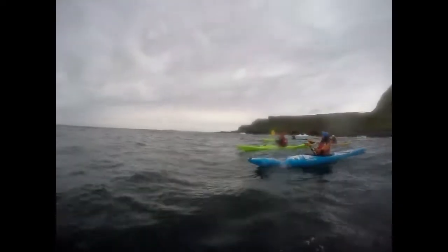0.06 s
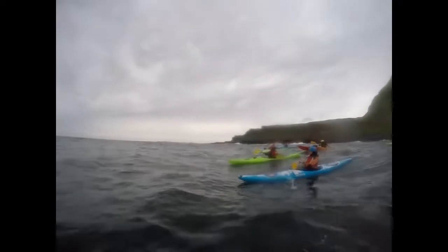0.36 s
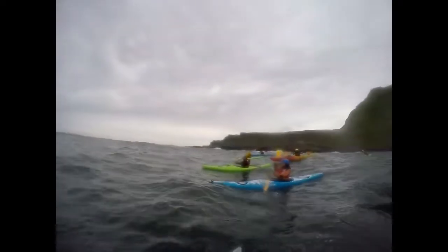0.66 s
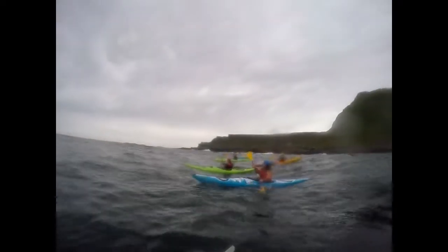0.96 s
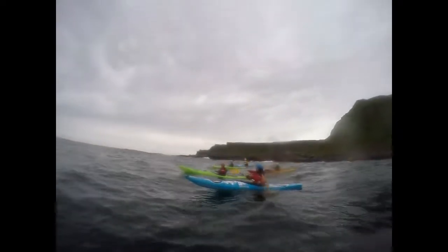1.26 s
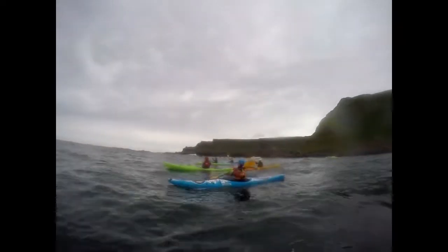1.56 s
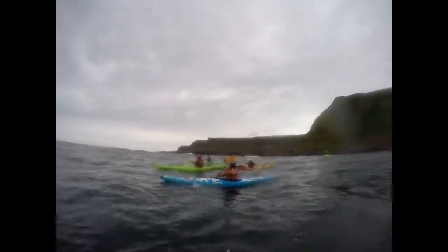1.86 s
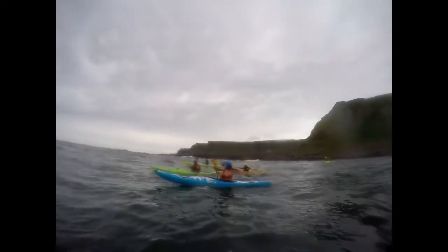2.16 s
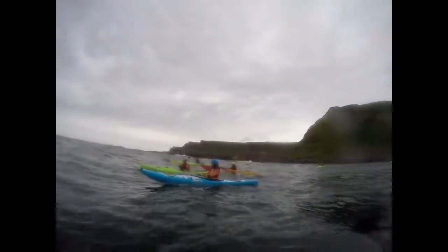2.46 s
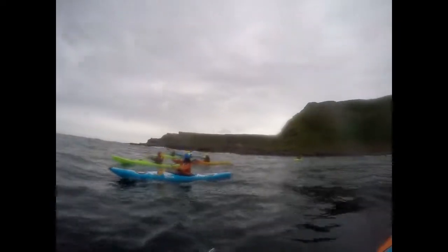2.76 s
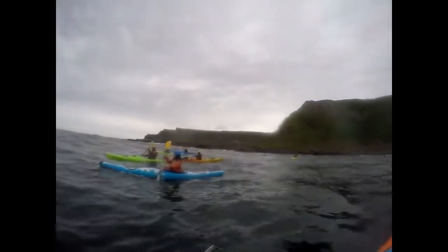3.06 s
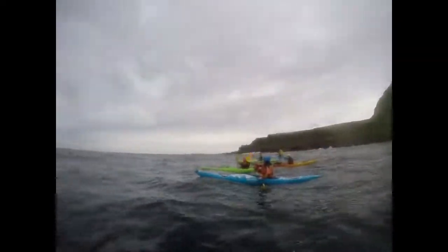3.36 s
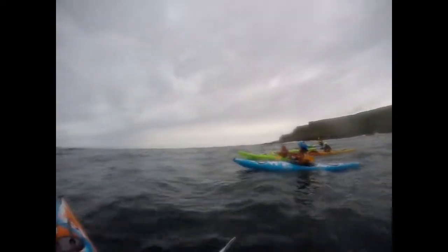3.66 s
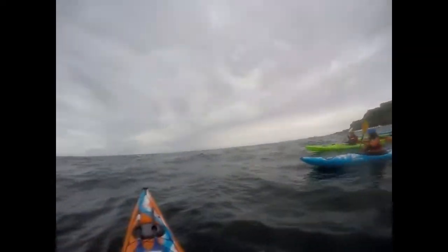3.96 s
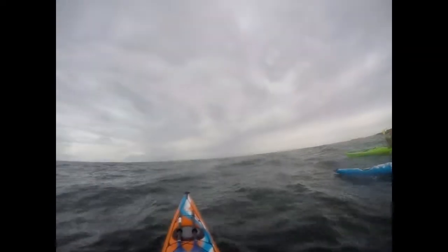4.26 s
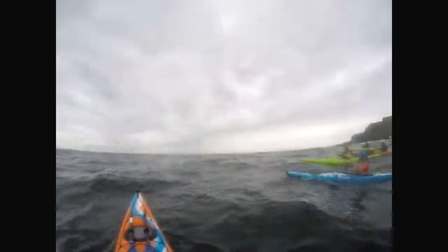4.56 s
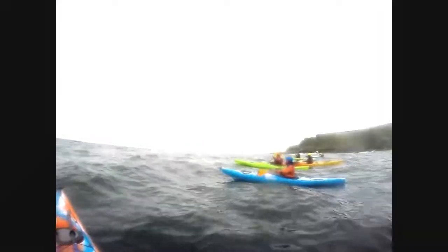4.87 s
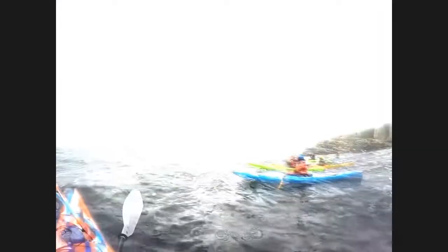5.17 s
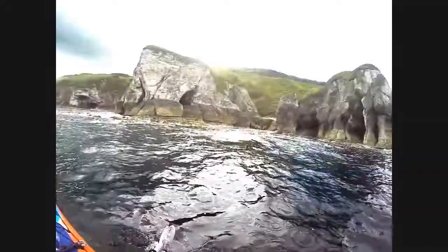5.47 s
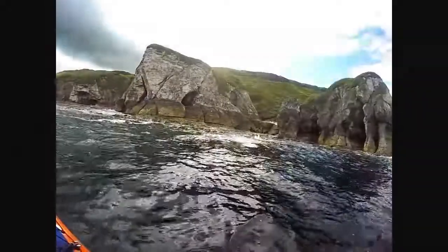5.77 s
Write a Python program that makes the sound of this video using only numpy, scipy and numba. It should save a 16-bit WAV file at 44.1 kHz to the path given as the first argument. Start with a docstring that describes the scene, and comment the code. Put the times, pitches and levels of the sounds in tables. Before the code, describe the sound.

Choppy sea water sloshes and slaps against a kayak hull, with bubbly plinks, pattering spray and a soft wash of waves behind. Wind rumbles and buffets the microphone, which sits close to the water in a waterproof case. Near the end the open sea fades away, and slightly brighter splashing cuts in suddenly with more wind rumble.

```python
"""Wavelets slosh and slap a kayak's hull in choppy sea, folding in air that rings as bubbles.
Spray and drips patter down over the wash of the sea. The water is heard through a waterproof
camera case on the paddler; wind rumbles and buffets on the case.
Open water fades out; a second scene cuts in, close under cliffs, with brighter splashing."""
import sys
import numpy as np
from scipy import signal
from scipy.fft import rfft, irfft, next_fast_len
from scipy.io import wavfile
from scipy.ndimage import uniform_filter1d
from numba import njit

SR = 44100
rng = np.random.default_rng(int(sys.argv[2]) if len(sys.argv) > 2 else 0)


def transcribe(signal):
    """Save signal, clipped to [-1, 1], as a 16-bit WAV file at the path in sys.argv[1]."""
    frames = np.atleast_2d(signal).T
    limited = np.clip(frames, -1, 1)
    pcm = np.round(limited * 32767).astype(np.int16)
    wavfile.write(sys.argv[1], SR, pcm)


N = 265482

# Slosh and spray spectra: (frequency [Hz], relative density [dB])
SLOSH_OPEN_SPECTRUM = [(600, -3), (1200, -27), (1500, -2.5), (2100, -0.5), (2600, 1), (3200, -9),
                       (5000, -43)]
SLOSH_CLIFF_SPECTRUM = [(600, -32), (1200, -1), (1900, 6.5), (2350, 4.5), (2650, -5), (3200, -8),
                        (5000, -37)]
SPRAY_SPECTRUM = [(1500, -18), (3100, -2), (4500, -5), (5800, -3.5), (6600, -9.5), (8500, -9),
                  (12000, -13.5), (15500, -23)]
# Wavelets at the hull: (crest time [s], length [s], relative slosh [dB], relative spray [dB])
HULL_WAVELETS = [(.02, 0.096, -54.5, -60), (.23, 0.12, -62, -65.5), (.385, 0.093, -54.5, -55),
                 (.45, 0.084, -55.5, -72), (.59, .1, -59, -65), (.79, .09, -56.5, -64),
                 (.89, 0.14, -60, -61.5), (1.21, 0.12, -58.5, -62), (1.59, 0.099, -64, -56),
                 (1.73, 0.13, -63, -61.5), (1.91, 0.14, -71, -61), (2.17, 0.046, -64, -72),
                 (2.5, 0.13, -58.5, -58), (2.74, 0.21, -77, -58.5), (2.9, 0.12, -62, -58),
                 (3.1, .06, -70, -60), (3.3, 0.25, -64, -84), (3.66, .12, -69, -73), (4.05, 0.14, -59, -72),
                 (4.29, 0.19, -57, -66), (5.35, 0.18, -54.5, -64.5), (5.52, 0.15, -61, -60.5),
                 (5.66, 0.085, -57, -69)]


def hull_water(spectrum, rest_db, slosh_trim_db, spray_trim_db):
    """Water laps at rest_db (slosh, spray); each wavelet adds bubbles and spray in uneven spurts."""
    slosh_level, spray_level = swells(HULL_WAVELETS, rest_db, rise=0.51, fall=0.66)
    spurts = wander(rate_hz=55)
    slosh = bubble_cloud(per_s=2800, low_hz=908, high_hz=3650, cycles=30.7, scatter_db=2.5)
    spray = bubble_cloud(per_s=4600, low_hz=2647, high_hz=12400, cycles=18.7, scatter_db=2.5)
    slosh = colour(slosh, spectrum) * slosh_level * undb(slosh_trim_db + 0.93 * spurts)
    spray = colour(spray, SPRAY_SPECTRUM) * spray_level * undb(spray_trim_db + 1.47 * spurts)
    return slosh + spray


# Waves slapping the hull: (time [s], relative level [dB], pitch [Hz], spread [oct], time scale [s])
HULL_SPLASHES = [ (0.022, -49, 2260, .16, .012), (0.074, -54.5, 4230, 0.84, 0.0099),
                 (.103, -48.5, 1850, 0.21, 0.013), (0.328, -41.5, 1790, 0.33, 0.0048),
                 (.354, -44, 2190, 0.67, 0.0072), (.579, -52.5, 5900, 0.39, .008),
                 (0.609, -54, 4150, 0.55, 0.015), (0.782, -44, 2730, 0.54, .003),
                 (.793, -44.5, 2100, .3, .012), (.794, -45.5, 4600, 0.3, .011),
                 (.847, -45.5, 4200, 0.45, .003), (0.926, -50, 2030, 0.28, .005),
                 (1.134, -50, 2150, 0.28, 0.0071), (1.414, -52, 3220, 0.14, .005),
                 (1.446, -53.5, 1740, 0.22, 0.0067), (1.557, -52.5, 3200, 0.36, 0.031),
                 (1.595, -33.5, 3050, 0.27, .0014), (1.598, -36.5, 3720, .3, .003),
                 (1.599, -52, 9000, .5, 0.0037), (1.606, -50, 3480, .59, 0.012),
                 (2.071, -46, 1260, .25, 0.0033), (2.252, -54, 2530, 0.31, .009),
                 (2.414, -54.5, 5130, 0.6, 0.0068), (2.481, -53, 1610, .5, 0.01),
                 (2.862, -51, 4600, 0.2, .007), (2.906, -52.5, 1160, 0.27, .022),
                 (3.107, -47, 4230, 0.29, 0.0077), (3.712, -56, 4600, 0.46, 0.018),
                 (4.253, -43, 2030, 0.48, .004), (4.359, -54.5, 2420, 0.36, .01),
                 (4.74, -48.5, 1880, 0.43, .0065), (5.319, -52, 2470, 0.15, .018),
                 (5.368, -55, 1950, .56, .023), (5.4, -53, 4050, .65, .016),
                 (5.443, -54, 7040, 0.55, 0.015), (5.4557, -37.5, 7160, 0.595, 0.0023),
                 (5.552, -53, 4760, 0.28, 0.0058), (5.67, -43, 4260, .41, 0.0046)]


def splashes(trim_db, cycles, tail_db, tail_stretch, slap_db, rolloff_hz, count=120):
    """Each splash bursts into bubbles over a dull slap; weaker droplets fall back after it."""
    out = np.zeros(N)
    late = np.arange(count) % 3 == 0
    t = np.arange(SR // 4) / SR
    slap_band = signal.butter(1, [120, 1200], "band", fs=SR, output="sos")
    for time_s, db, pitch_hz, spread_oct, scale_s in HULL_SPLASHES:
        weakness, ring = rng.random((2, count))
        start_s = scale_s * rng.triangular(0, .5, 1.4, count) * np.where(late, tail_stretch, 1)
        detune = np.sqrt(6) * rng.triangular(-1, 0, 1, count)  # unit variance
        hz = np.minimum(pitch_hz * 2 ** (spread_oct * detune), SR / 3)
        gain = undb(-8 * weakness + tail_db * late) * (hz / pitch_hz) ** .3
        gain /= 1 + (hz / rolloff_hz) ** 4  # the tiniest bubbles are weakest
        burst = bubbles(start_s, hz, cycles * (.5 + ring), gain, glide=0.24, samples=len(t))
        slap_noise = rng.standard_normal(len(t)) * t / scale_s * np.exp(-2 * t / scale_s)
        slap = signal.sosfilt(slap_band, slap_noise)
        splash = unit(burst) + undb(slap_db) * unit(slap)
        add(out, time_s, splash * undb(db) * np.sqrt(scale_s / t[-1]))
    return out * undb(trim_db)


# Single bubbles: (time [s], relative peak [dB], pitch [Hz], ring [cycles])
LONE_BUBBLES = [(.362, -43.5, 1980, 110), (.448, -39, 2140, 56), (1.595, -25, 2870, 22),
                (1.598, -29, 3030, 25), (1.924, -47.5, 4870, 79), (1.967, -49, 4900, 60),
                (2.531, -44, 2210, 55), (2.573, -42, 2330, 55), (2.721, -39.5, 4400, 41),
                (5.386, -39, 1140, 31), (5.395, -34.5, 1730, 31), (5.456, -29, 3420, 33),
                (5.456, -30, 7200, 40), (5.585, -40.5, 3500, 61), (5.602, -44, 4600, 50)]


def plinks(trim_db, glide):
    """Lone bubbles ring out close to the case."""
    start_s, db, hz, cycles = np.array(LONE_BUBBLES, float).T.copy()
    return bubbles(start_s, hz, cycles, undb(db + trim_db), glide, N)


# Air pockets: (time [s], level [dB], pitch [Hz], length [s])
AIR_GULPS = [(.845, -65, 586, 0.019), (2.04, -65.5, 510, .05), (2.205, -64, 550, .055),
             (5.665, -59.5, 342, 0.027)]


def gulps():
    """Trapped air gulps hollowly, sagging in pitch."""
    return throbs(AIR_GULPS, glide=-0.057)


def drips(level_db):
    """Stray drops fall back into the sea at random and ring faintly."""
    drops = bubble_cloud(per_s=12, low_hz=1983, high_hz=6200, cycles=53, scatter_db=3.5)
    return undb(level_db) * unit(drops)


# Wind spectra: (frequency [Hz], relative density [dB])
RUMBLE_SPECTRUM = [(5, -12), (14, 4), (26, -1.5), (36, -0.5), (50, -11), (70, -27), (140, -36.5)]
BUFFET_SPECTRUM = [(35, -25), (60, 2.5), (95, 6), (112, -8), (130, -10), (200, -25), (400, -62)]
# Gusts on the case: (peak time [s], length [s], relative rumble [dB], relative buffeting [dB])
WIND_GUSTS = [(.03, 0.11, -41, -78), (.34, 0.23, -40, -66), (.6, 0.1, -40.5, -63), (.79, 0.11, -44.5, -60),
              (1.38, 0.2, -60, -60), (1.86, 0.28, -46, -75), (2.2, 0.13, -46, -74), (2.46, 0.058, -41, -74),
              (2.84, 0.39, -43.5, -75), (3.33, 0.21, -42.5, -53.5), (3.92, 0.12, -55, -53),
              (4.1, 0.24, -52, -53.5), (4.48, 0.2, -64, -54), (4.71, .08, -60, -54), (5.56, 0.21, -40, -69),
              (5.79, 0.15, -42.5, -66), (5.89, 0.064, -53, -50.5), (5.98, .1, -44, -68)]


def wind(rest_db, rumble_trim_db, buffet_trim_db):
    """A breeze rumbles and buffets on the case at rest_db (rumble, buffeting); gusts swell both."""
    rumble_level, buffet_level = swells(WIND_GUSTS, rest_db, rise=0.56, fall=0.52)
    rumble = undb(rumble_trim_db) * rumble_level * eddies(RUMBLE_SPECTRUM, steadiness=0.94)
    buffet = undb(buffet_trim_db) * buffet_level * eddies(BUFFET_SPECTRUM, steadiness=0.74)
    return rumble + buffet


def eddies(spectrum, steadiness):
    """Turbulent pressure; steadiness (0 to 1) evens its strength over a few swings."""
    pressure = colour(rng.standard_normal(N), spectrum)
    power = uniform_filter1d(pressure ** 2, SR // 10) + 1e-6
    return unit(pressure / power ** (steadiness / 2))


# Eddies hitting the case: (time [s], level [dB], pitch [Hz], length [s])
EDDY_THUMPS = [(3.350, -32.5, 64.7, .016), (4.045, -42, 83, 0.023), (4.107, -38.5, 63.7, 0.027)]


def thumps():
    """Single eddies thump the case, rising in pitch."""
    return throbs(EDDY_THUMPS, glide=0.2)


# Far sea spectra: (frequency [Hz], relative density [dB])
WASH_OPEN_SPECTRUM = [(70, -44), (130, -3.5), (250, -6.5), (570, -9.5), (660, -15.5), (800, -12),
                      (1260, -14.5), (1400, -9.5), (1700, -11), (2500, -18), (4000, -22), (6000, -24.5),
                      (8000, -27.5), (12000, -31), (15500, -34.5)]
WASH_CLIFF_SPECTRUM = [(70, -15), (150, -6.5), (330, -6), (620, -10.5), (1200, -8.5), (1550, -6),
                       (2000, -14), (2400, -11), (2900, -12.5), (4200, -18.5), (8000, -31), (12000, -31),
                       (15500, -32)]


def wash(spectrum, level_db, flicker_db):
    """Countless far wavelets merge into a softly wavering hiss."""
    hiss = colour(rng.standard_normal(N), spectrum)
    return hiss * undb(level_db + flicker_db * wander(rate_hz=22.37))


# Case resonances per scene: (frequency [Hz], width [Hz], lift [dB])
CASE_OPEN_MODES = [(1475, 280, 3), (2030, 386, 6.5), (2552, 190, 5.5), (3370, 106, 5), (4710, 590, 5.5),
                   (5620, 330, 4), (7140, 400, 4), (9670, 710, 1.5), (14070, 240, 11)]
CASE_CLIFF_MODES = [(2287, 410, 8.2), (2540, 170, 7.8), (3470, 200, 2.8), (4600, 310, 4.5),
                    (5950, 730, 4.2), (7200, 560, 4), (9700, 360, 4.1), (14100, 360, 3)]


def case(x, modes):
    """The walls and air of the case ring briefly at their resonances."""
    size = next_fast_len(N + SR // 10)
    f = np.fft.rfftfreq(size, 1 / SR)
    lift = sum(db / (1 + 2j * (f - hz) / width_hz) for hz, width_hz, db in modes)
    return irfft(rfft(x, size) * undb(lift), size)[:N]


@njit
def bubbles(start_s, hz, cycles, gain, glide, samples):
    """Each bubble swells in about a cycle, rings down 50 dB and rises in pitch as it nears the surface."""
    out = np.zeros(samples)
    for k in range(len(start_s)):
        first, life = int(start_s[k] * SR), cycles[k] * SR / hz[k]
        phase, level, decay = 0., gain[k], np.exp(-5.75 / life)
        for i in range(min(int(life) + 1, samples - first)):
            phase += 2 * np.pi * hz[k] / SR * (1 + glide * i / life)
            out[first + i] += level * min(phase / 7, 1.) * np.sin(phase)
            level *= decay
    return out


def bubble_cloud(per_s, low_hz, high_hz, cycles, scatter_db):
    """A steady rain of bubbles: many faint, a few loud."""
    when, pitch, rarity, ring = rng.random((40000, 4))[:int(per_s * N / SR)].T
    hz = low_hz * (high_hz / low_hz) ** pitch
    gain = undb(-scatter_db * np.log(np.maximum(rarity, .004)))
    return bubbles(when * N / SR, hz, cycles * (.5 + ring), gain, glide=0.4, samples=N)


def throbs(table, glide):
    """Short swings of air pressure that swell, slide in pitch and die."""
    out = np.zeros(N)
    for time_s, db, hz, length_s in table:
        t = np.arange(int(2 * length_s * SR)) / SR - length_s
        swing = np.sin(2 * np.pi * hz * t * (1 + glide * t / length_s))
        envelope = np.sqrt(2) * undb(db) * np.exp(-(2 * t / length_s) ** 2)
        add(out, time_s - length_s / 2, envelope * swing)
    return out


def swells(table, rest_db, rise, fall):
    """Two envelopes over resting levels; rise and fall are shares of each row's length."""
    t = np.arange(N) / SR
    power = undb(rest_db)[:, None] ** 2 * np.ones(N)
    for peak_s, length_s, *db in table:
        width_s = length_s * np.where(t < peak_s, rise, fall)
        power += undb(db)[:, None] ** 2 * np.exp(-((t - peak_s) / width_s) ** 2)
    return np.sqrt(power)


def colour(x, spectrum):
    """Filter by (Hz, dB) points, falling 12 dB/oct beyond the ends; rms 1."""
    hz, db = np.transpose(spectrum)
    size = next_fast_len(N)
    f = np.maximum(np.fft.rfftfreq(size, 1 / SR), 1)
    skirts = np.minimum(f / hz[0], 1) ** 2 * np.minimum(hz[-1] / f, 1) ** 2
    gain = skirts * undb(np.interp(np.log(f), np.log(hz), db))
    return unit(irfft(rfft(x, size) * gain, size)[:N])


def wander(rate_hz):
    """Random drift at rms 1."""
    knots = rng.standard_normal(2048)
    return unit(np.interp(np.arange(N) / SR * rate_hz, np.arange(len(knots)), knots))


def add(out, time_s, x):
    """Mix x in at time_s."""
    first = max(int(time_s * SR), 0)
    out[first:first + len(x)] += x[:N - first]


def undb(db):
    """Decibels to gain."""
    return 10 ** (np.asarray(db) / 20)


def unit(x):
    """Scale to rms 1."""
    return x / np.sqrt(np.mean(x ** 2) + 1e-20)


def scene():
    """Open water fades out, then the water under the cliffs cuts in."""
    near = splashes(trim_db=-7.5, cycles=13, tail_db=-5, tail_stretch=2.1, slap_db=-7.5, rolloff_hz=14000)
    near += plinks(trim_db=-6.5, glide=0.078) + drips(level_db=-79.5) + gulps()
    open_water = wash(WASH_OPEN_SPECTRUM, level_db=-62, flicker_db=1.0)
    open_water += hull_water(SLOSH_OPEN_SPECTRUM, (-64, -68.5), slosh_trim_db=-5.5, spray_trim_db=-5.5)
    cliff_water = wash(WASH_CLIFF_SPECTRUM, level_db=-59.3, flicker_db=0.94)
    cliff_water += hull_water(SLOSH_CLIFF_SPECTRUM, (-61, -66), slosh_trim_db=-6.5, spray_trim_db=-4)
    open_sea = case(open_water + near, CASE_OPEN_MODES) + thumps()
    open_sea += wind(rest_db=(-50, -65), rumble_trim_db=1, buffet_trim_db=1)
    cliffs = case(cliff_water + near, CASE_CLIFF_MODES)
    cliffs += wind(rest_db=(-44.5, -62), rumble_trim_db=2, buffet_trim_db=0)
    t = np.arange(N) / SR
    fade_start_s, fade_length_s, cut_s = 4.337, 0.96, 5.292
    fade = np.clip(1 - (t - fade_start_s) / fade_length_s, 0, 1) ** 1.076
    cut = np.clip((t - cut_s) / .002, 0, 1)
    return (open_sea * fade * (1 - cut) + cliffs * cut)[None]


def record(dry):
    """The camera cuts the treble above 15.4 kHz."""
    return signal.sosfilt(signal.ellip(12, .2, 70, 15400, fs=SR, output="sos"), dry)


dry = scene()
out = record(dry)
transcribe(out)
```